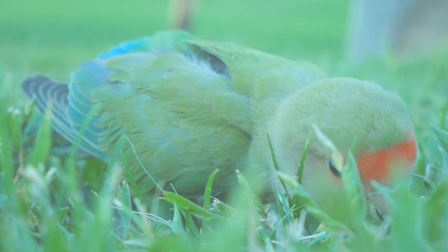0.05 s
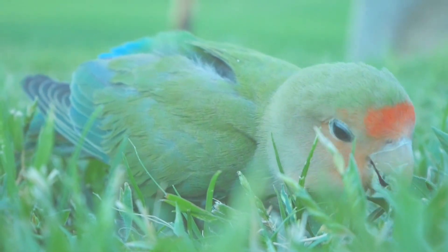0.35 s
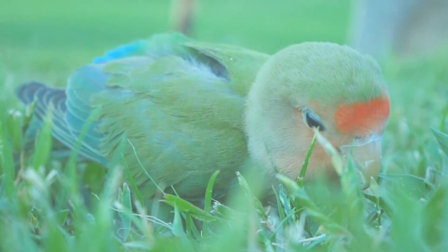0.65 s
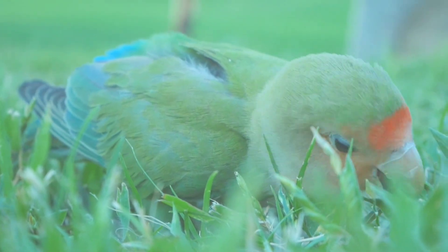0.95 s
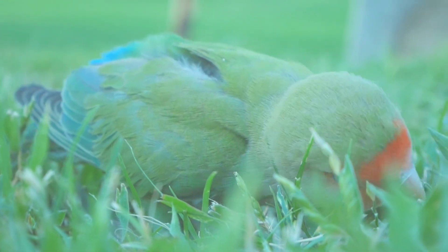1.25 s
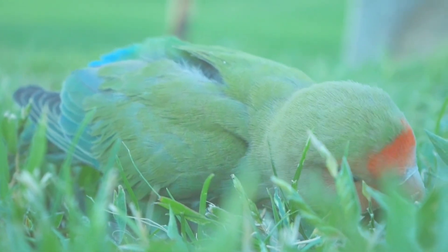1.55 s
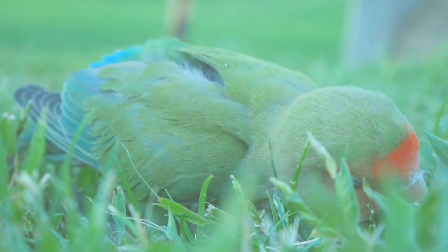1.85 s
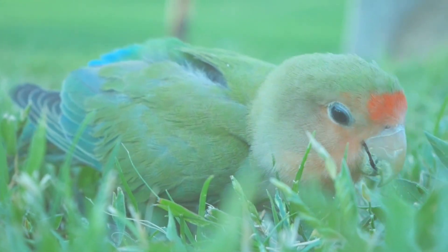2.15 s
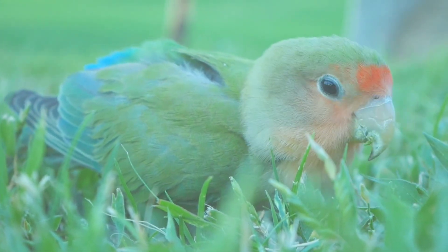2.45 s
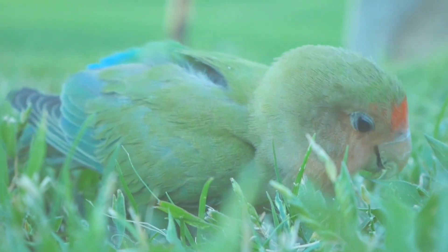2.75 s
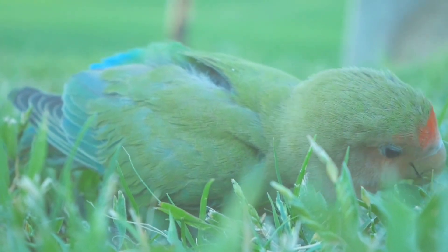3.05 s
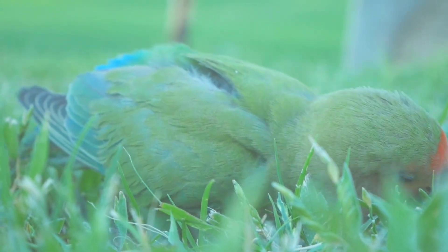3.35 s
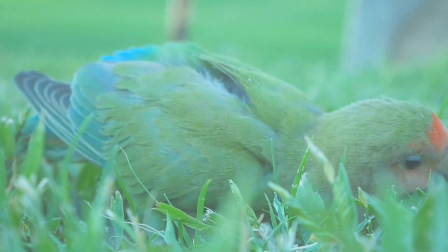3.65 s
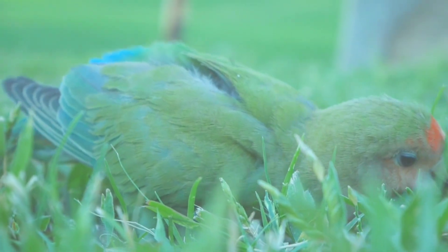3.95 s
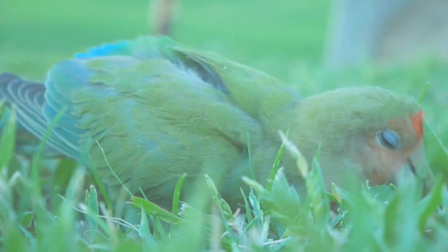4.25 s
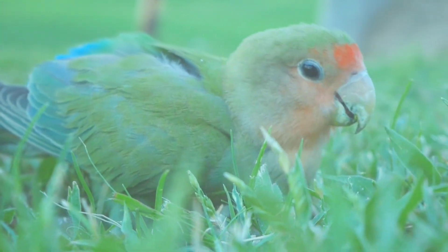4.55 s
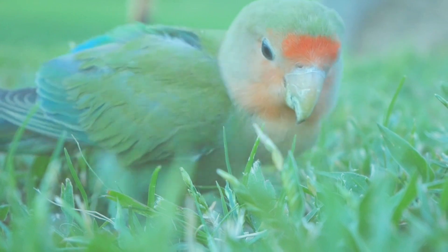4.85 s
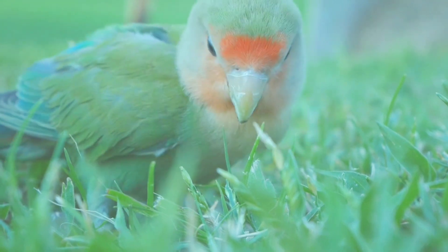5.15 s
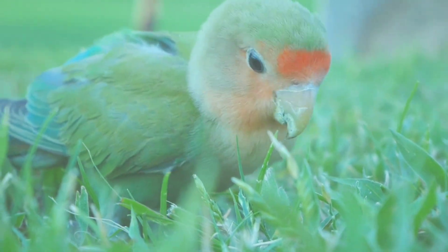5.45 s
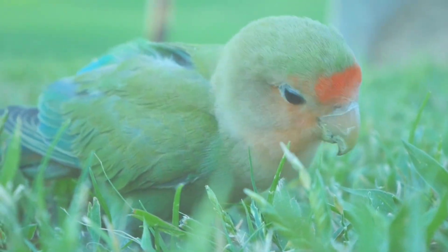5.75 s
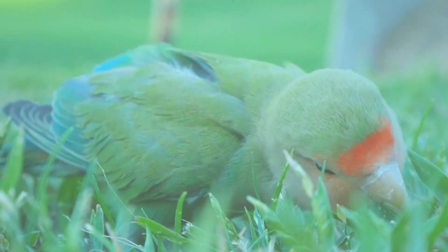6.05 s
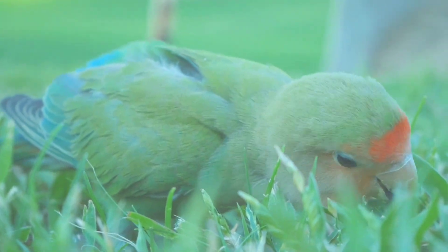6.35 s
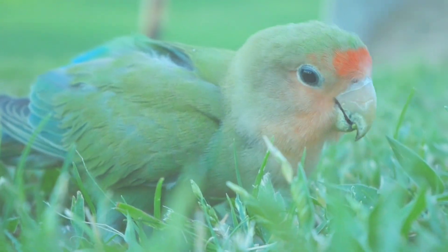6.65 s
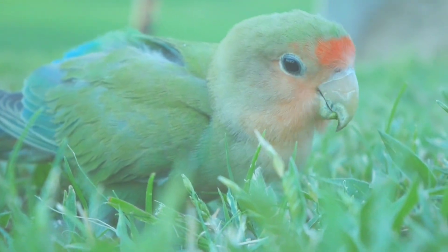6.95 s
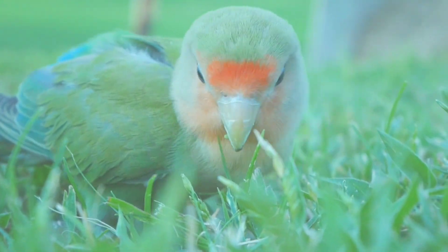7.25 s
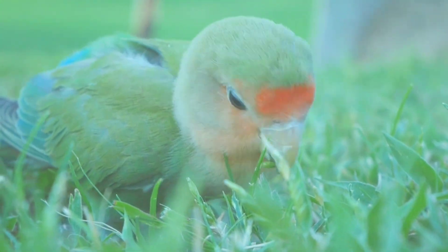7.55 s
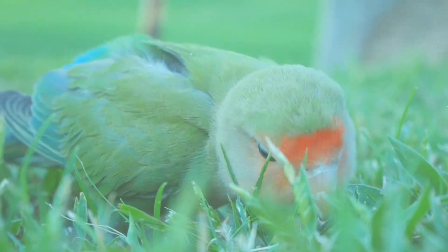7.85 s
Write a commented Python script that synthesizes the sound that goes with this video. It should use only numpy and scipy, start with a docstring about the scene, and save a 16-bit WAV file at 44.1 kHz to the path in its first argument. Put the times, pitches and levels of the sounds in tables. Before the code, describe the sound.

Over fading far-off traffic, lovebirds give shrill chirps, a rasp and two squawks while one softly nibbles grass nearby.

```python
"""A walled lawn, where lovebirds call over the low rumble of distant traffic.
Their voice organ, the syrinx, makes arching trilled whistles, held notes, squawks, chirps and nasal
notes; when it beats chaotically it gives one harsh rasp. The walls echo the calls.
Close by, one bird feeds on the grass: its beak clicks shut, with grass tearing and short dry snaps."""
import sys
import numpy as np
from scipy import signal
from scipy.fft import rfft, irfft, next_fast_len
from scipy.io import wavfile
from scipy.ndimage import uniform_filter1d, map_coordinates

SR = 44100
rng = np.random.default_rng(int(sys.argv[2]) if len(sys.argv) > 2 else 0)


def bounce(signal):
    """Save signal as a 16-bit WAV file at the path given by the first command-line argument."""
    frames = np.transpose(np.atleast_2d(signal))
    limited = np.clip(frames, -1, 1)
    pcm = np.round(limited * 32767).astype(np.int16)
    wavfile.write(sys.argv[1], SR, pcm)


N = 353682
T = np.arange(N) / SR
SCOOP_S = 0.0088  # how quickly a call slides up to its pitch

# How a bird's throat boosts or weakens each frequency: frequency_hz, gain_db
THROAT_COLOUR = [(1400, -9), (2000, -2.5), (2600, 4.5), (3200, 7), (3800, 8), (4250, 6), (4900, -4.5),
                 (5900, -14.5), (6500, -23.5), (7000, -26.5), (9400, -21.5), (11000, -34.5), (13000, -24)]


def undb(db):
    """Turn decibels into a factor to multiply by."""
    return 10 ** (np.asarray(db) / 20)


def unit(x):
    """Scale a sound to an average strength (rms) of 1."""
    return x / np.sqrt(np.mean(x ** 2) + 1e-18)


def gain_at(hz, points):
    """Read the gain at any frequency from rows of frequency_hz, gain_db."""
    point_hz, db = np.transpose(points)
    return undb(np.interp(np.log(np.maximum(hz, 1)), np.log(point_hz), db))


def colour(x, points):
    """Boost or weaken a sound's frequencies by rows of frequency_hz, gain_db."""
    size = next_fast_len(x.shape[-1])
    gains = gain_at(np.arange(size // 2 + 1) * SR / size, points)
    return irfft(rfft(x, size) * gains, size)[..., :x.shape[-1]]


def resonate(x, hz, width_hz):
    """Make a sound ring near one frequency by filtering it twice."""
    peak = signal.iirpeak(hz, hz / width_hz, fs=SR)
    return signal.lfilter(*peak, signal.lfilter(*peak, x))


def wander(t, rate):
    """A smooth random wobble of size about 1, changing `rate` times a second."""
    return map_coordinates(rng.standard_normal(2 ** 13), [(t - t[0]) * rate], order=3, mode="wrap")


def fade(t, edge_s):
    """Give a note a soft start and end."""
    return np.clip(np.minimum(t - t[0], t[-1] - t) / edge_s, 0, 1)


def swell(start_s, end_s, edge_s):
    """Fade in, hold and fade out between two moments of the scene."""
    return np.clip(np.minimum(T - start_s, end_s - T) / edge_s, 0, 1)


def add(track, start_s, sound):
    """Mix a sound into a track at the given time."""
    i = int(start_s * SR)
    part = sound[max(-i, 0):N - i]
    track[max(i, 0):max(i, 0) + len(part)] += part


def traffic(ebb_db_per_s=1.414, flicker_db=1, hiss_follow=0.21, split_hz=900):
    """Distant traffic rumbles and slowly dies down; the faint hiss above it fades less."""
    # Tone of the traffic: frequency_hz, gain_db
    traffic_colour = [(20, -27), (40, -30), (62, -17.5), (125, -4), (240, 1), (320, -4.5), (500, -12),
                      (790, -24), (1100, -23.5), (2500, -24.5), (4000, -35), (6300, -39.5), (11500, -43),
                      (15400, -60)]
    # Strength of the part that makes the noise wide in stereo: frequency_hz, gain_db
    width_colour = [(60, -11), (200, -11), (380, -4.5), (700, 3), (1300, -0.5), (2400, -2), (4400, -1.5),
                    (8000, -4), (14000, -22.5)]
    centre, side = colour(rng.standard_normal((2, N)), traffic_colour)
    stereo = unit(centre) + np.array([[1], [-1]]) * colour(side, width_colour) / np.std(centre)
    rumble = signal.sosfilt(signal.butter(1, split_hz, fs=SR, output="sos"), stereo)
    hiss = stereo - rumble
    rumble_db = -34 - ebb_db_per_s * T
    hiss_db = rumble_db.mean() + hiss_follow * (rumble_db - rumble_db.mean())
    return rumble * undb(rumble_db + flicker_db * wander(T, 12)) + hiss * undb(hiss_db)


def wall_echoes(x, early_db=-1.5, early_s=0.17, late_db=-4.0, late_s=0.56, patchy_db=6):
    """Near walls add scattered echoes and a longer tail to a sound, different on the left and right."""
    t = np.arange(SR) / SR
    echoes = rng.standard_normal((2, SR)) * undb(patchy_db * rng.standard_normal((2, SR)))
    early = unit(echoes * undb(-60 * t / early_s) * (t > .003))
    late = unit(rng.standard_normal((2, SR)) * undb(-60 * t / late_s) * np.minimum(t / 0.028, 1))
    response = (undb(early_db) * early + undb(late_db) * late) / np.sqrt(SR)
    return x + signal.fftconvolve(x[None], response, axes=1)[:, :N]


def nibbles(count=6, from_s=6.25, to_s=6.65):
    """Chewing makes soft beak clicks at random moments: rows of start_s, crack_db, ring_db."""
    when, strength = rng.uniform(size=(count, 2)).T
    scatter_db = 2 * strength - 1
    return list(zip(from_s + when * (to_s - from_s), -44 + scatter_db, -51 + scatter_db))


def feeding(crack_gain_db=-13, ring_gain_db=-1, crack_s=0.0011, grain_db=6):
    """The beak shuts with a crack that makes it ring; tearing grass and short dry snaps crackle."""
    # Snaps of the beak, before the two gains above: start_s, crack_db, ring_db
    clicks = [(0.435, -27, -35.5), (0.468, -32, -40), (0.5582, -40, -45.5), (0.581, -43, -47.5),
              (2.029, -26, -48), (2.392, -22.5, -74), (3.885, -31.5, -56), (4.1496, -25, -41),
              (4.154, -31, -35), (4.3273, -18.5, -37.5), (5.582, -42, -44), (6.177, -38, -44.5),
              (6.2858, -45, -41), (6.2928, -32, -40.5), (6.335, -40, -46), (6.397, -32.5, -46.5),
              (6.490, -34, -40.5), (6.976, -34, -50)]
    # Where the beak rings: frequency_hz, width_hz, gain_db
    beak_rings = [(2735, 730, 4.5), (3950, 1760, -8.5), (4680, 700, -25)]
    # Grass tearing and short dry snaps: start_s, length_s, level_db
    tears_and_snaps = [(0.248, 0.043, -46.5), (0.542, 0.19, -56), (1.876, 0.11, -58), (2.394, 0.011, -40),
                       (3.589, 0.012, -40), (4.255, .064, -47.5), (4.378, 0.21, -54.5),
                       (4.981, 0.037, -48.5), (5.042, 0.018, -40.5), (5.111, .048, -42),
                       (5.209, 0.0061, -45), (6.803, 0.19, -54)]
    # Crisp tone of the cracks, tears and snaps: frequency_hz, gain_db
    crackle_colour = [(1500, -11.5), (3000, -28.5), (6000, -19), (9000, -4.5), (12000, -2), (14000, -18),
                      (16000, -21)]
    cracks, rings = np.zeros(N), np.zeros(N)
    t = np.arange(SR // 50) / SR
    for start, crack_db, ring_db in list(clicks) + nibbles():
        snap = unit(rng.standard_normal(len(t)) * np.exp(-t / crack_s))
        add(cracks, start, undb(crack_db + crack_gain_db) * snap)
        ring = sum(undb(db) * resonate(snap, hz, width) for hz, width, db in beak_rings)
        add(rings, start, undb(ring_db + ring_gain_db) * unit(ring))
    for start, length, db in tears_and_snaps:
        t = np.arange(0, length, 1 / SR)
        crackle = rng.standard_normal(len(t)) * undb(grain_db * wander(t, 1500))
        add(cracks, start, undb(db) * unit(crackle * fade(t, length / 3)))
    return colour(cracks, crackle_colour) + rings


def chirp(length_s, glide_hz):
    """A short pure tone glides through three pitches: start, middle and end."""
    t = np.arange(0, length_s, 1 / SR)
    curve = np.polyfit([0, .5, 1], glide_hz, 2)
    hz = np.polyval(curve, t / length_s) * (1 + .006 * wander(t, 600))
    tone = np.sin(2 * np.pi * np.cumsum(hz) / SR)
    return unit(tone * np.sqrt(gain_at(hz, THROAT_COLOUR)) * fade(t, length_s / 4))


def nasal_note(length_s, pitch_hz, scoop=0.3, scoop_s=0.011, roughness=0.011):
    """A low note made only of overtones slides up to a flat pitch as it grows louder."""
    # Overtones of the nasal voice: pitch_multiple, level_db
    overtones = [(2, -7.5), (3, -6), (4, 2), (5, -20), (6, -28.5), (7, -32), (8, -40), (9, -44), (10, -38)]
    t = np.arange(0, length_s, 1 / SR)
    hz = pitch_hz * (1 - scoop * np.exp(-t / scoop_s) + roughness * wander(t, 502.4))
    phase = 2 * np.pi * np.cumsum(hz) / SR
    tone = sum(undb(db) * np.sin(round(k) * phase) for k, db in overtones)
    growth = 1 - 0.85 * np.exp(-t / 0.031)
    return unit(tone * growth * fade(t, 0.0028))


def rasp(grain_db=3, growl_db=-37, burst_db=-27.5):
    """The syrinx beats chaotically, ringing the throat in a growl that breaks into hiss at its hardest."""
    # Where the throat rings: frequency_hz, width_hz, gain_db
    throat_rings = [(1795, 360, 0), (2660, 380, -1), (3370, 460, 7.5), (4800, 330, -7)]
    # Tone of the hiss: frequency_hz, gain_db
    hiss_colour = [(1000, -53), (2000, -46), (3000, 4), (4400, 3.5), (6200, -8.5), (7500, -23.5),
                   (9500, -22), (12500, -34), (15000, -53)]
    beating = rng.standard_normal(N) * undb(grain_db * wander(T, 300))
    growl = sum(undb(db) * resonate(beating, hz, width) for hz, width, db in throat_rings)
    growl_gain = undb(growl_db) * swell(6.91, 7.39, edge_s=.11)
    hiss_gain = undb(burst_db) * swell(7.14, 7.215, edge_s=0.019) + undb(-20) * growl_gain
    return unit(growl) * growl_gain + unit(colour(beating, hiss_colour)) * hiss_gain


def whistle(t, hz, level_db, depth_hz, overtones_db, trills_per_s=118, breath_db=-36):
    """The syrinx tone trills in quick dips of pitch; the throat favours the harmonic near 3-4 kHz."""
    cycles = np.cumsum(trills_per_s * (1 + .2 * wander(t, 90))) / SR
    dip = (np.sin(np.pi * cycles) ** 2) ** 1.84  # the power narrows each dip
    uneven_dip = dip * (1 + 0.25 * wander(t, 700))
    hz = hz + 2 * depth_hz * (dip.mean() - uneven_dip) + 10 * wander(t, 239.6)
    # In each deep dip the membranes of the syrinx press together: the tone gets weaker and buzzier.
    press = (dip - dip.mean()) * np.tanh(depth_hz / 100)
    # On low notes with little trill the slack membranes beat unevenly, which roughens the tone.
    roughness = .2 * (2000 / hz) ** 2 / (1 + depth_hz / 60)
    phase = 2 * np.pi * np.cumsum(hz) / SR + roughness * wander(t, 2500)
    lowest, *upper = (gain_at(k * hz, THROAT_COLOUR) * np.sin(k * phase) for k in range(1, 5))
    overtones = sum(undb(-6.5 - 7 * k) * part for k, part in enumerate(upper))
    tone = lowest * undb(-3 * press) + overtones * undb(overtones_db + 4 * press)
    # So small a bird gives off little low sound.
    tone = signal.sosfilt(signal.butter(4, 1400, "high", fs=SR, output="sos"), tone)
    # Air rushing through the syrinx is shaped by the same throat.
    breath = unit(colour(rng.standard_normal(len(t)), THROAT_COLOUR))
    strength = np.sqrt(uniform_filter1d(tone ** 2, size=700) + 1e-12)
    return (tone / strength + undb(breath_db) * breath) * undb(level_db) * fade(t, 0.0028)


def held_note(length_s, pitch_hz, level_db, depth_hz, overtones_db, scoop=0.077, swell_db=5.5):
    """A whistle slides up to its pitch, stays there and swells to its end."""
    t = np.arange(0, length_s, 1 / SR)
    hz = pitch_hz * (1 - scoop * np.exp(-t / SCOOP_S))
    return whistle(t, hz, level_db - swell_db * (1 - t / length_s), depth_hz, overtones_db)


def squawk(whistle_s, buzz_s, whistle_hz, buzz_hz, scoop, whistle_db, buzz_db):
    """A sagging whistle breaks down to a buzz, whose second harmonic takes over."""
    break_s, droop_s, sag_per_s = 0.00471, 0.00647, 1.5
    t = np.arange(0, whistle_s + buzz_s, 1 / SR)
    starting = np.exp(-t / SCOOP_S)
    ending = np.exp((t - t[-1]) / droop_s)  # the pitch droops as the breath ends
    broken = .5 + .5 * np.tanh((t - whistle_s) / (2 * break_s))  # 0 = whistle, 1 = buzz
    blend = lambda before, after: before + (after - before) * broken
    sag = 1 - sag_per_s * (t - whistle_s)
    hz = blend(whistle_hz, buzz_hz) * sag * (1 - scoop * starting - 0.217 * ending)
    # The voice is weaker at the start and while it breaks.
    level_db = blend(whistle_db, buzz_db) - 11 * starting - 5 * np.sin(np.pi * broken)
    return whistle(t, hz, level_db, depth_hz=48, overtones_db=blend(-11, 13.5))


def arch(rise_s, hold_s, fall_s, start_hz, top_hz, end_hz, ease, level_db,
         top_depth_hz, trill_onset_s, overtones_db, pressed_start):
    """A whistle climbs, holds and falls; it trills on the slopes and weakens as the voice slackens."""
    lowest_hz, slope_depth_hz = 1523, 317  # where the voice gives out; trill depth on the slopes
    t = np.arange(0, rise_s + hold_s + fall_s, 1 / SR)
    to_climb = np.clip(1 - t / rise_s, 0, 1) ** ease
    fallen = np.clip((t - rise_s - hold_s) / fall_s, 0, 1) ** 1.6  # gentle at first, then steeper
    hz = top_hz + (start_hz - top_hz) * to_climb + (end_hz - top_hz) * fallen
    slack = np.clip((top_hz - hz) / (top_hz - lowest_hz), 0, 1)
    trill = np.sin(np.pi * slack ** 0.66) * np.minimum(t / trill_onset_s, 1) ** 2
    depth_hz = top_depth_hz + (slope_depth_hz - top_depth_hz) * trill
    # The push of air builds up quickly, tires late in the call and is uneven throughout.
    push_db = -5 * np.exp(-t / 0.0055) - 2 * (t / t[-1]) ** 2 + 3.5 * wander(t, 46.8)
    # A pressed start flicks up from below, bright and loud, then relaxes.
    pressed = pressed_start * np.exp(-t / 0.046)
    flick = 1 - 0.166 * pressed_start * np.exp(-t / SCOOP_S)
    bright_db = overtones_db + 23 * pressed + 4.5 * trill + 5 * np.sin(np.pi * np.sqrt(fallen))
    loud_db = level_db - 19 * slack + 4 * pressed + push_db
    return whistle(t, hz * flick, loud_db, depth_hz, bright_db)


def flock():
    """The lovebirds call, each call at its own moment."""
    # Arching whistles: start_s, rise_s, hold_s, fall_s, start_hz, top_hz, end_hz,
    # ease (1 = straight rise), level_db, top_depth_hz (of the trill), trill_onset_s,
    # overtones_db, pressed_start (0 to 1)
    arches = [ (.752, 0.15, .038, .032, 1724, 3362, 1734, 1.01, -10.5, 60, .07, -4.5, .75),
              (1.485, .2, .05, 0.013, 1880, 3161, 3120, 1.41, -14, 84, 0.065, -6, 1),
              (2.813, .194, 0.03, .175, 1432, 3325, 1858, 2.01, -16.5, 100, .08, -6.5, 0.2),
              (3.395, 0.13, .025, 0.11, 2155, 3566, 1940, 1.62, -16.5, 160, 0.034, -5.5, 0.37),
              (4.41, .088, .025, .262, 2962, 3532, 1802, .85, -13.5, 60.6, 0.16, -6, 0),
              (4.965, 0.077, .005, 0.23, 2550, 2753, 2130, 1.2, -24.5, 427, 0.0073, -9.5, 0.12),
              (5.255, .042, 0.01, 0.006, 3180, 3990, 3820, 1.2, -23, 69, 0.0035, 1.5, 0.015),
              (5.624, 0.18, .066, .032, 1603, 3043, 1716, 1.8, -16, 95, 0.064, -7, 0.26)]
    # Held notes, most leading into a call:
    # start_s, length_s, pitch_hz, level_db, depth_hz (of the trill), overtones_db
    held_notes = [(3.28, 0.05, 2297, -30, 70, 21), (3.336, 0.062, 2179, -28, 27, 8),
                  (4.337, .08, 2955, -25, 16, -9), (4.881, 0.12, 2770, -25.5, 22, -11),
                  (4.939, 0.019, 2822, -14.5, 25, -14), (7.016, .245, 1691, -32, 63, 14),
                  (7.545, 0.035, 1912, -27, 130, 8), (7.833, 0.022, 2050, -17.5, 48, 10.5)]
    # Whistles that break to a buzz: start_s, whistle_s, buzz_s, whistle_hz, buzz_hz,
    # scoop (share of the pitch), whistle_db, buzz_db
    squawks = [(7.578, .072, .072, 3242, 2147, 0.0074, -18, -19),
               (7.856, .047, .07, 3340, 1950, 0.17, -21, -20.5)]
    # Flat nasal notes: start_s, end_s, pitch_hz, level_db
    nasal_notes = [(-.03, 0.018, 1107, -26), (0.093, 0.206, 1080, -23)]
    # Small gliding chirps between the calls: start_s, length_s, start_hz, end_hz, level_db
    chirps = [(.188, 0.014, 4500, 3690, -23.5), (1.011, 0.063, 5280, 3520, -36),
              (1.185, 0.034, 5690, 3670, -35.5), (1.388, .04, 5830, 3500, -33.5),
              (2.284, .01, 4490, 3000, -41.5), (4.122, .03, 4420, 5060, -41.5),
              (4.378, .031, 4300, 5870, -41), (4.414, 0.0081, 5720, 4000, -33),
              (4.9, 0.0038, 4920, 3850, -26), (5.855, .018, 5080, 3320, -28.5),
              (5.942, 0.02, 4410, 3940, -34), (6.197, .015, 3740, 5170, -41),
              (6.849, 0.0051, 4720, 3750, -31.5), (6.957, .012, 3820, 5250, -34),
              (7.306, .0084, 4070, 4900, -32), (7.548, 0.0049, 4690, 3650, -29)]
    # Faint peeps that rise and fall: start_s, length_s, top_hz, level_db
    peeps = [(0.67, 0.081, 3820, -41.5), (6.134, 0.043, 3660, -43), (6.281, 0.041, 3570, -47.5)]
    calls = np.zeros(N)
    for voice, table in (arch, arches), (held_note, held_notes), (squawk, squawks):
        for start, *shape in table:
            add(calls, start, voice(*shape))
    for start, end, hz, db in nasal_notes:
        add(calls, start, undb(db) * nasal_note(end - start, hz))
    for start, length, start_hz, end_hz, db in chirps:
        add(calls, start, undb(db) * chirp(length, [start_hz, np.sqrt(start_hz * end_hz), end_hz]))
    for start, length, top_hz, db in peeps:
        add(calls, start, undb(db) * chirp(length, [0.86 * top_hz, top_hz, 0.86 * top_hz]))
    return calls + rasp()


def scene(lag_samples=14):
    """Echoing calls from the left, the feeding bird close by and traffic far off."""
    # Tone of the calls at the left microphone: frequency_hz, gain_db
    left_colour = [(1000, 12.5), (2300, -2.5), (3200, -5.5), (3800, -4), (4300, -1.5), (5200, -2.5),
                   (7000, -1), (12000, -13)]
    # Tone of the calls at the right microphone: frequency_hz, gain_db
    right_colour = [(1000, 13.5), (2300, 0), (3200, -6), (3800, -11.5), (4300, -14.5), (5200, -4.5),
                    (7000, 5), (12000, -3)]
    left, right = wall_echoes(flock())
    right = np.pad(right, (lag_samples, 0))[:N]  # the calls reach the right side later
    calls = np.array([colour(left, left_colour), colour(right, right_colour)])
    return calls + feeding() + traffic()


def record(dry):
    """Cut away the highest treble, above 15400 Hz."""
    return signal.sosfilt(signal.ellip(8, .2, 70, 15400, fs=SR, output="sos"), dry)


dry = scene()
out = record(dry)
bounce(out)
```